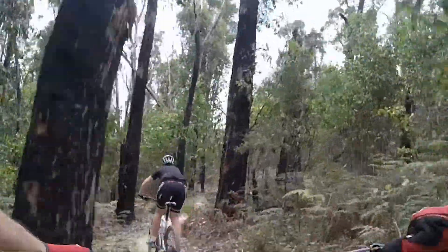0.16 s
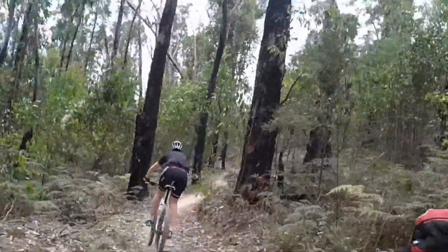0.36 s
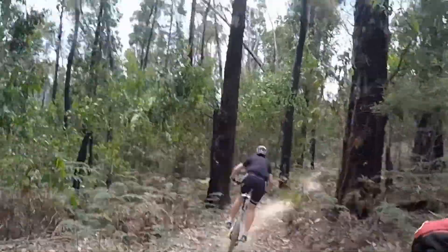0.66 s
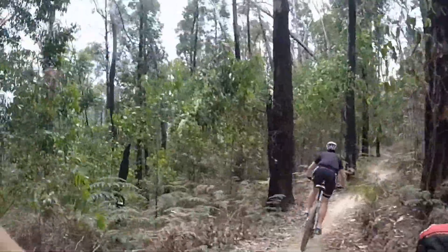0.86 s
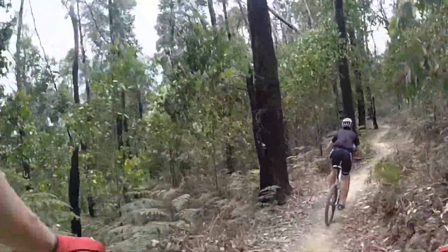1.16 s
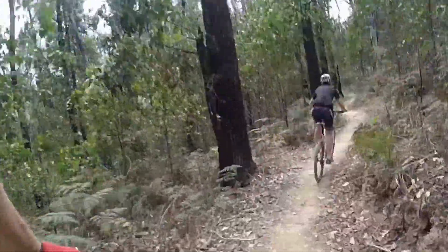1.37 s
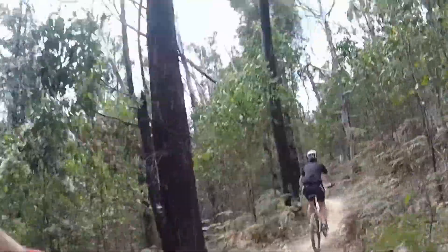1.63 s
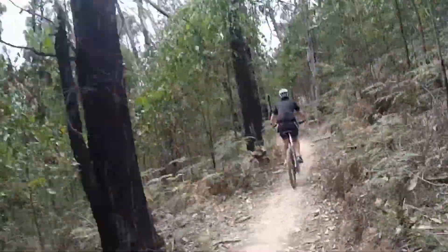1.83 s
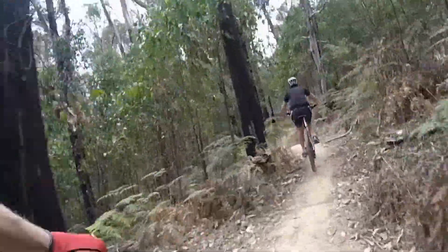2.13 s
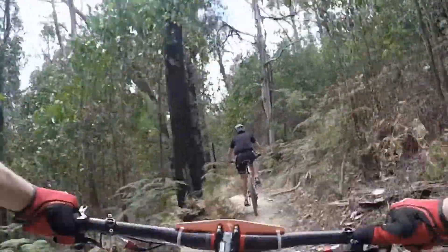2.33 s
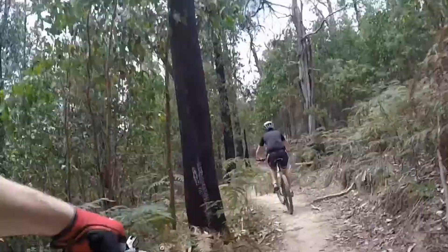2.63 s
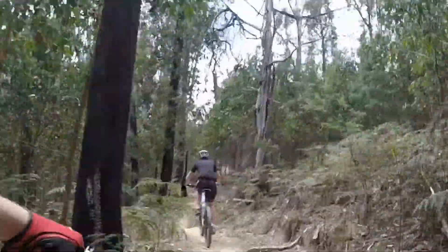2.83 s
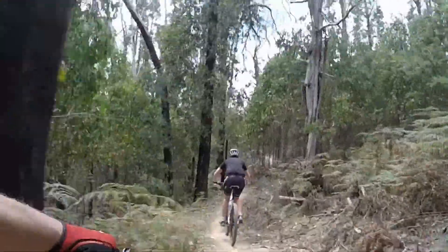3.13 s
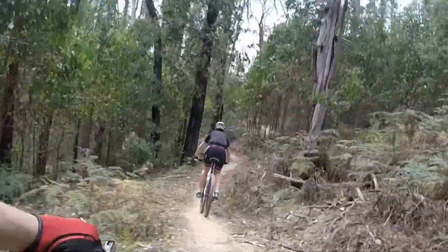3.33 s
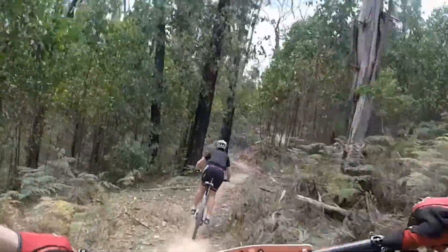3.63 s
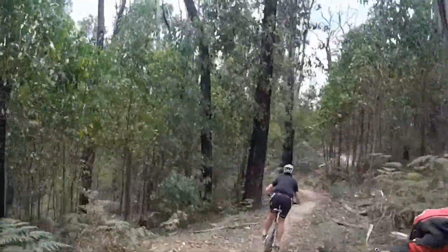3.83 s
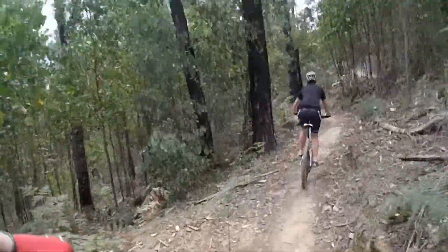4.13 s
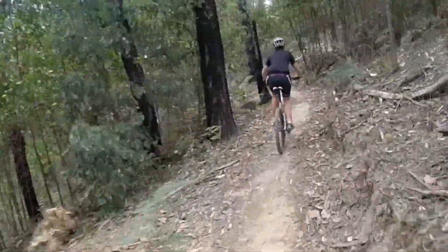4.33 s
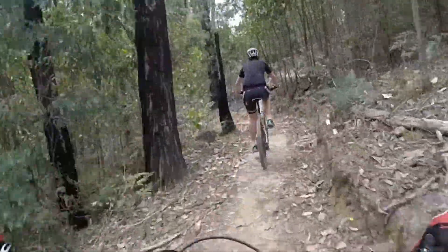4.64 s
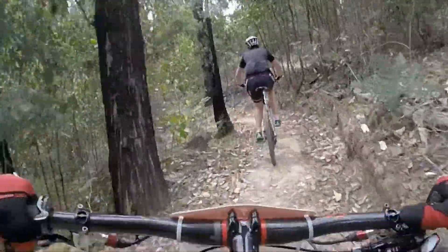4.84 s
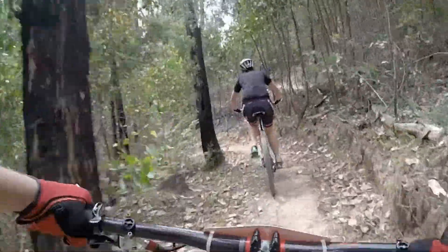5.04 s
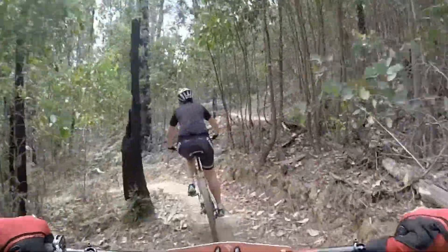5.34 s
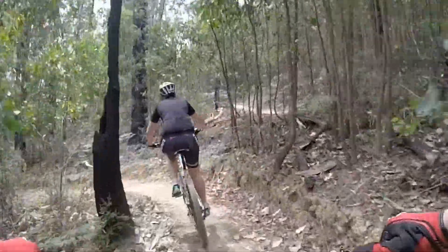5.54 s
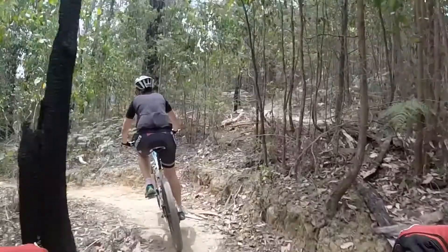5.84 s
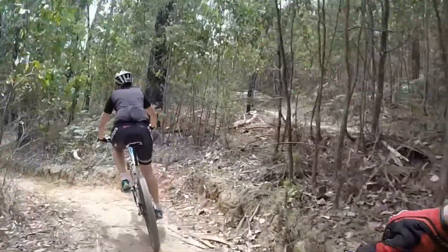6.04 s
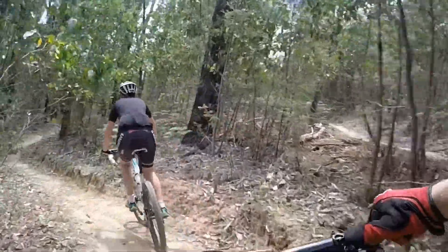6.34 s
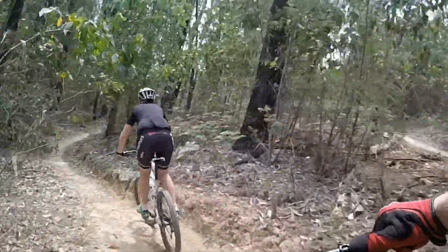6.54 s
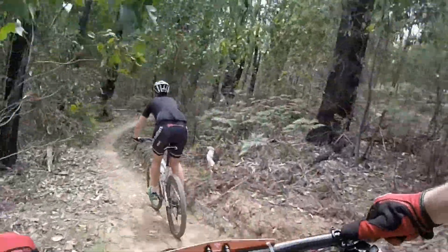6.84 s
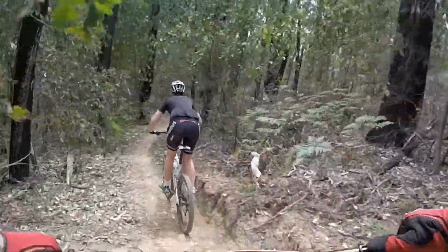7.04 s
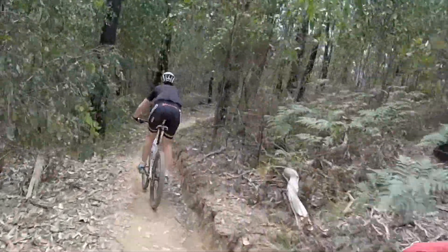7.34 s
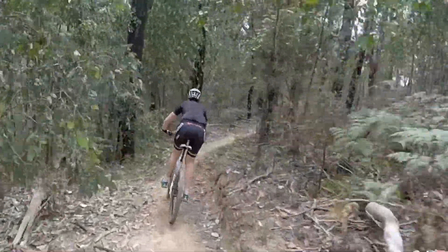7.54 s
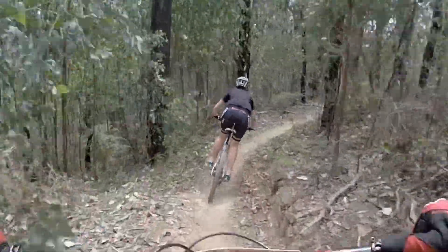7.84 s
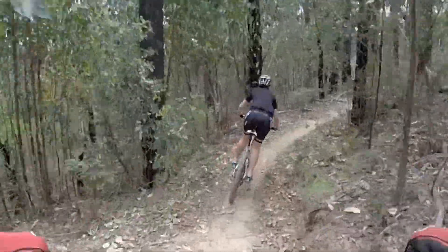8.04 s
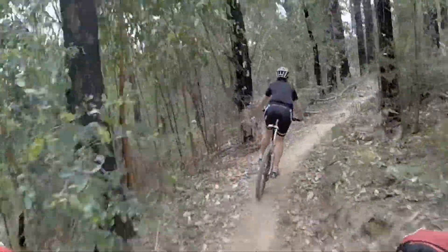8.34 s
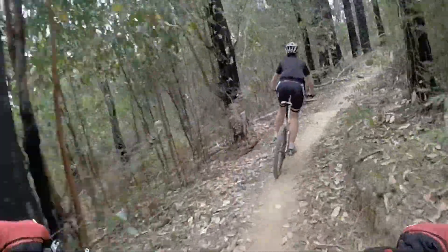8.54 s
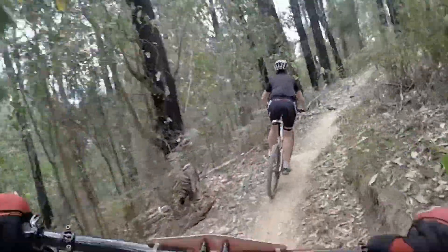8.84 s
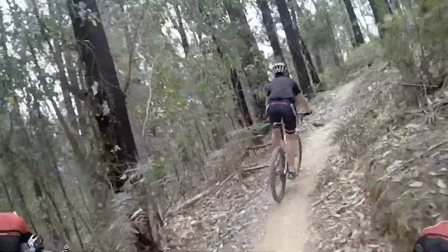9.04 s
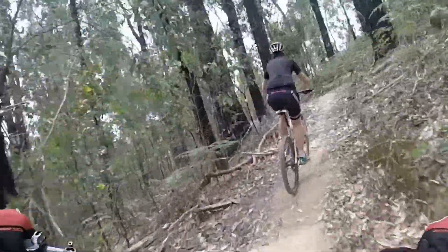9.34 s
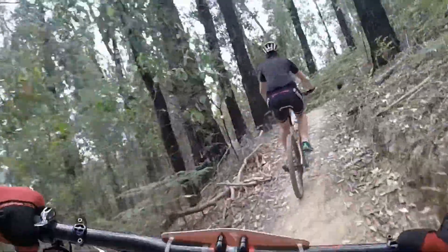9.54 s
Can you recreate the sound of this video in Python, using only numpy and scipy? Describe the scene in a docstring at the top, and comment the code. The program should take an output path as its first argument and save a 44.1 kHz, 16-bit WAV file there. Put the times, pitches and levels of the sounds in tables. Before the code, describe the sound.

A mountain bike rides a dry forest trail, heard close and slightly boxy from a microphone on the rider's chest. Tyres crunch and rumble over dirt and leaves throughout, under low, fluttering wind. For the first 2.3 seconds the chain whirrs with rapid metallic ticks, swelling with each pedal stroke; tyre scuffs, sharp clacks, thuds and a gust cluster around 1.4 to 1.9 seconds. From 2.3 to 4.2 seconds the bike coasts and the chain falls quiet, leaving dull bumps, short scrapes, small gear clicks and a gust near 3 seconds. Pedalling resumes at 4.2, with a loud clatter around 4.5 and another gust just after. From 5 to 7.5 seconds the ride is smoother, the chain pulsing over softer wind. Scuffs, knocks and gusts return around 7.7 to 9 seconds, and pedalling continues to the end, near 9.7 seconds.

```python
"""Mountain bike on a dry forest trail

Heard from a camera in a housing on the rider's chest. The chain ticks tooth by tooth under
pedalling and falls quiet during a bumpy coast. Tyres crunch and scuff over dirt and leaves,
loose parts rattle, bumps thud through the mount, and wind buffets the microphone."""
import sys
import numpy as np
from scipy import signal
from scipy.fft import rfft, irfft, next_fast_len
from scipy.io import wavfile
from scipy.ndimage import uniform_filter1d, map_coordinates

SR = 44100
rng = np.random.default_rng(int(sys.argv[2]) if len(sys.argv) > 2 else 0)


def store_pcm(level_fs):
    """Save levels as 16-bit WAV."""
    pcm = np.round(np.clip(level_fs, -1, 1) * 32767).astype(np.int16)
    wavfile.write(sys.argv[1], SR, np.atleast_2d(pcm).T)


N = 427329
TIME = np.arange(N) / SR

# Chain speed. Each row: time in seconds, teeth per second.
CHAIN_SPEED = [(0.1, 89), (0.47, 45), (0.64, 81), (0.83, 80), (1.02, 54), (1.17, 80), (1.42, 57), (1.9, 88),
               (2.25, 107), (4.2, 82), (4.45, 108), (4.9, 105), (5.25, 105), (5.55, 88), (6.2, 74.5),
               (7.22, 63), (7.38, 77), (7.7, 98), (7.95, 81), (8.4, 110), (8.85, 119), (9.06, 93),
               (9.3, 104), (9.6, 99)]
# Cog spectra. Each row: frequency in Hz, gain in dB.
CHAINRING_COLOUR = [(1200, -24.5), (2100, 5.5), (2450, 13.5), (2640, 12), (2900, 11), (3200, 8.5),
                    (3600, 2), (5000, -28)]
SPROCKET_COLOUR = [(2400, -34), (3250, 8), (3560, 17.5), (3750, 11), (4000, -11.5), (4350, 7), (5000, -23),
                   (8000, -36.5)]
# Chainring resonances. Each row: centre in Hz, half width in Hz, lift in dB.
CHAINRING_MODES = [(2578, 31, 5.4), (2622, 42, 8.9), (3030, 66, 1.6)]
# Lulls in air and trail, with a few lifts. Each row: time in seconds, airflow and rumble change in dB.
LULLS = [(.11, -20.5, -4), (.33, -12, -1), (.57, -3, -3), (.95, 3, -1.5), (1.2, 1, -1.5), (1.94, -8, -7),
         (2.21, -1, 1.5), (2.77, 3.5, -2), (3.58, 7, -6), (3.92, 0.5, -1.5), (4.1, 1, 3.5), (5.03, -8, 1.5),
         (5.46, -6, 3), (5.88, -7, -4.5), (6.06, -2, -2.5), (6.279, -13, -4), (6.39, -1, 0), (6.7, -2, -1),
         (6.84, 3.5, -4), (7.41, -2.5, -4), (7.85, -2, -2.5), (8.23, -4.5, 1), (9.14, 0, -1.5)]
LULL_S = .06


def chain(seat_s=.0026, settle_s=.0036, scatter_db=1.98, db_per_octave=4.5, detune=.026, drift=.018):
    """Rollers seat on teeth and ring links, chainring and sprocket, louder with speed and pedal force."""
    # Pedalling. Each row: start and end in seconds, chain gain in dB, extra sprocket gain in dB.
    spells = [(0.028, 2.33, -2.5, -5.5), (4.18, 9.9, -1.8, 0.46)]
    # Pedal strokes tighten the chain. Each row: start and length in seconds, rise in dB.
    strokes = [(0.11, 0.34, 4.5), (0.448, 0.1, 7.5), (0.708, 0.26, 6.5), (1.17, 0.27, 6.5),
               (1.592, 0.1, 15.5), (1.903, .1, 3.5), (2.116, 0.16, 8.5), (4.41, 0.21, 5), (4.6, 0.39, 5),
               (5.046, 0.2, 6), (5.354, 0.21, 7), (5.58, 0.079, 4.5), (5.82, 0.31, 5.5), (6.3, 0.33, 7),
               (6.866, 0.3, 6.5), (7.325, 0.35, 6), (7.76, 0.31, 7), (8.232, 0.2, 4.5), (8.534, 0.29, 7),
               (8.899, 0.25, 7), (9.25, .26, 7.5), (9.585, 0.15, 8)]
    # Steel link spectrum. Each row: frequency in Hz, gain in dB.
    link_colour = [(300, -14.5), (800, 7), (1500, -10), (2200, 16), (3600, 8.5), (4400, 15), (5300, 4.5),
                   (7000, 11), (7800, -2.5), (11000, -4), (13000, -6), (14500, -35)]
    # Link resonances. Each row: centre in Hz, half width in Hz, lift in dB.
    link_modes = [(4250, 93, 4.5), (5385, 127, 9.5), (5850, 88, 7.5), (6120, 81, -9.5), (6600, 150, 4.5),
                  (8680, 360, 5), (10700, 150, 8.5), (11480, 130, 8.5), (12300, 150, -2.5), (12500, 140, 5)]
    # Notes struck by every tooth. Each row: pitch in Hz, base level in dB.
    cog_notes = [(2620, -96.5), (2880, -89.5), (3560, -91), (3720, -94.5)]
    teeth_per_s, = follow(CHAIN_SPEED)
    teeth = np.cumsum(teeth_per_s) / SR + .0277 * walk(60)
    tooth = teeth.astype(int)
    age_s = teeth % 1 / teeth_per_s
    seating = unit((1 - np.exp(-(age_s / seat_s) ** 2)) * np.exp(-age_s / settle_s))
    running_db = db_per_octave * np.log2(teeth_per_s / 70) + .5 * walk(25)
    push_db = sum(db * held(start_s, start_s + length_s, ramp_s=.09) for start_s, length_s, db in strokes)
    chain_load, sprocket_load = 0, 0
    for start_s, end_s, db, sprocket_db in spells:
        engaged = held(start_s, end_s, ramp_s=.15)
        chain_load += engaged * amp(db)
        sprocket_load += engaged * amp(db + sprocket_db)

    def part(spectrum, modes, load, slide_db, slack_db, push_share, lag_s):
        """One steel part, rung by seating and by sliding between teeth."""
        strength = amp(scatter_db * rng.standard_normal(N // 100))[tooth]
        chatter = unit(np.hypot(strength * seating, amp(slide_db)) * rng.standard_normal(N))
        drive = load * amp(slack_db + push_share * push_db + running_db)
        return waver(colour(chatter * drive, spectrum, modes), lag_s)

    out = part(link_colour, link_modes, chain_load, slide_db=-3, slack_db=-84, push_share=.66, lag_s=0)
    out += part(CHAINRING_COLOUR, CHAINRING_MODES, chain_load,
                slide_db=-15, slack_db=-78, push_share=.83, lag_s=.0011)
    out += part(SPROCKET_COLOUR, (), sprocket_load,
                slide_db=-15, slack_db=-79.5, push_share=.68, lag_s=.0006)
    for hz, db in cog_notes:
        offset, phase_turns = rng.standard_normal((N // 100, 2))[tooth].T
        tooth_hz = hz * (1 + detune * offset + drift * walk(15))
        note = np.sqrt(2) * np.sin(2 * np.pi * (tooth_hz * age_s + phase_turns))
        out += note * seating * chain_load * amp(db + push_db + running_db)
    return sway(out, depth_db=1.55, rate_hz=34)


def tooth_pings():
    """A roller snaps onto its tooth; chainring or sprocket gives one clear tick."""
    # Each row: start in seconds, level in dB, pitch in Hz.
    pings = [(4.437, -58, 3620), (4.469, -58, 3620), (4.975, -60, 2700), (5.117, -60, 3550),
             (5.129, -59, 2646), (5.148, -55, 2740), (5.177, -61, 2700), (5.186, -58, 3627),
             (5.389, -67, 3580), (5.470, -62, 3599), (5.794, -57, 2700), (5.859, -60, 2840),
             (5.886, -61, 3569), (5.925, -65, 3621), (5.990, -62, 2860), (6.261, -61, 3660),
             (6.291, -60, 3660), (6.389, -66, 3610), (6.419, -59, 2810), (6.537, -61, 3603),
             (6.554, -62, 3700), (7.318, -65, 3648), (7.369, -70, 3640), (7.955, -58, 2626),
             (8.012, -62, 3633), (8.239, -60, 3660), (8.419, -54, 2707), (8.922, -57, 3670),
             (8.983, -58, 3572), (9.221, -58, 3607), (9.409, -61, 2665), (9.409, -56, 3656)]
    out = np.zeros(N)
    for start_s, db, hz in pings:
        add(out, start_s, amp(db) * ring(hz, decay_s=.0025))
    return out


def chain_rub(start_s=2.13, end_s=2.27, hz=2631.5, jitter=.0102, level_db=-69.5, flutter_db=2):
    """The chain rubs the chainring: a brief rough note, chopped tooth by tooth."""
    teeth_per_s, = follow(CHAIN_SPEED)
    chop = abs(np.sin(np.pi * np.cumsum(teeth_per_s) / SR))
    phase = 2 * np.pi * np.cumsum(hz * (1 + jitter * walk(250))) / SR
    gain = held(start_s, end_s, ramp_s=.09) * amp(level_db + flutter_db * walk(100))
    return gain * chop * np.sin(phase)


def loose_chain(swing_s=.035, sprocket_db=-3.5):
    """Slack links swing against chainring and sprocket and ring them."""
    # Each row: time in seconds, level in dB.
    swings = [(1.39, -75), (2.2, -71), (2.41, -75.5), (2.52, -78), (2.73, -79), (2.99, -82), (3.17, -74),
              (3.765, -76.5), (4.51, -69), (5.16, -69), (8.97, -66.5), (9.4, -70)]
    brush = rng.standard_normal(N) * swells([(s, amp(db)) for s, db in swings], swing_s, swing_s)
    chainring = colour(brush, CHAINRING_COLOUR, CHAINRING_MODES)
    return chainring + amp(sprocket_db) * colour(brush, SPROCKET_COLOUR)


def tyres(uneven_db=1.26, jerk_db=1.8):
    """Knobs crush and drum on dirt; uneven ground varies the load, and slips scrape in jerks."""
    # Ground. Each row: time in seconds, crunch in dB, rumble in dB.
    trail = [(0.0, -75.5, -69), (0.36, -78.5, -73.5), (0.9, -74.5, -72.5), (1.25, -76, -73),
             (1.72, -71, -63.5), (1.97, -75.5, -67.5), (2.2, -72, -69), (2.8, -75, -66), (3.12, -73, -67),
             (3.35, -77, -70.5), (4.25, -75, -71), (4.55, -69, -61), (4.88, -74, -70), (6.3, -77.5, -73.5),
             (7.15, -77.5, -72), (8.75, -70.5, -66.5), (9.12, -76, -68), (9.69, -74, -69)]
    # Extra load in dips and stony patches. Each row: time in seconds, rise in dB.
    patches = [(.02, 8), (.21, 4.5), (.43, 5), (.7, 3), (.88, 0.5), (1.03, 4.5), (1.49, 2), (1.78, 1.5),
               (3.41, 1), (3.6, 5), (3.79, 3), (4.2, 4), (4.53, 2), (5.7, 1.5), (6.53, 1.5), (7.2, 4),
               (7.92, 4.5), (8.36, 1), (8.97, 3.5)]
    # Sideways slips. Each row: start and length in seconds, level in dB.
    slips = [(0.208, 0.037, -78), (0.663, 0.028, -71.5), (0.993, 0.037, -72), (1.433, 0.033, -63),
             (1.475, .034, -65), (1.591, 0.0093, -54), (1.596, 0.059, -56), (1.608, 0.038, -63.5),
             (1.701, 0.069, -63.5), (2.54, 0.051, -72.5), (2.785, 0.032, -69.5), (2.85, 0.038, -68.5),
             (2.925, 0.049, -64.5), (2.967, 0.036, -61), (3.018, 0.049, -68), (3.103, 0.064, -68),
             (3.177, .045, -74), (3.709, 0.065, -70.5), (7.656, 0.038, -63), (7.746, 0.052, -68),
             (8.637, 0.07, -66.5), (8.904, 0.055, -68)]
    # Spectra. Each row: frequency in Hz, gain in dB.
    dirt_colour = [(200, -4.5), (450, 8), (1000, 9), (1600, 10.5), (2400, 7.5), (3600, 5.5), (4500, -2),
                   (7000, -7), (8000, -13.5), (13000, -21)]
    scuff_colour = [(120, 19), (310, 10.5), (480, 4), (660, 2), (900, 8), (1800, 8), (2280, 13.5),
                    (2600, 5), (3000, 7), (3700, -1), (4300, 1.5), (5000, -8.5), (7000, -10.5),
                    (13000, -44)]
    rumble_colour = [(30, 10.5), (70, 25.5), (110, 22.5), (170, 20), (240, 13.5), (320, 13), (450, 5),
                     (800, -10.5), (2000, -16.5), (6000, -60.5)]
    # Hollow ring of wheel and frame. Each row: centre in Hz, half width in Hz, lift in dB.
    wheel_modes = [(542, 52, -15.5), (650, 59, 4.5), (1360, 280, -1.5), (2345, 75, 2.5), (2940, 210, 1.5)]
    crunch_db, rumble_db = follow(trail)
    load_db = uneven_db * walk(45) + swells(patches, rise_s=.035, fall_s=.045)
    lull_db = swells([(s, db) for s, _, db in LULLS], LULL_S, LULL_S)
    slip = np.zeros(N)
    for start_s, length_s, db in slips:
        add(slip, start_s, amp(db) * signal.windows.tukey(int(length_s * SR), .35))
    crunch = (grit(per_s=5000, spread_db=2.5) + pebbles()) * amp(crunch_db + load_db)
    scuff = grit(per_s=5000, spread_db=.5) * slip * amp(jerk_db * walk(250))
    rumble = rng.standard_normal(N) * amp(rumble_db + load_db + lull_db)
    return colour(crunch, dirt_colour) + colour(scuff, scuff_colour, wheel_modes) + colour(rumble, rumble_colour)


def grit(per_s, spread_db):
    """Crumbs and leaves break: random impulses, many small, few large."""
    strength = amp(spread_db * np.minimum(rng.exponential(size=N), 2 * np.pi))
    return unit((rng.random(N) < per_s / SR) * strength * rng.choice([-1, 1], N))


def pebbles(per_s=40, relative_db=-6.5, spread_db=8, centre_hz=2084, spread_octaves=.52, slot_s=.005):
    """Small stones spat from under the knobs click at random pitch and strength."""
    out = np.zeros(N)
    for slot, (chance, size, pitch) in enumerate(rng.random((int(N / SR / slot_s), 3))):
        if chance < per_s * slot_s:
            hz = centre_hz * 2 ** (spread_octaves * (2 * pitch - 1))
            db = relative_db + spread_db * (2 * size - 1)
            add(out, slot * slot_s, amp(db) * ring(hz, decay_s=.0047))
    return out


def clacks(ring_db=-11.5, ring_s=.0035):
    """Chain and stones knock on the bike, brighter metal on metal; the struck part rings briefly."""
    # Each row: start in seconds, level in dB, decay scale in seconds, tilt in dB, ring in Hz.
    hits = [(0.286, -56, 0.0025, -1, 2800), (0.666, -55, 0.0044, -8, 2080), (0.865, -58, 0.003, -13, 2090),
            (0.876, -59, 0.0033, -13, 2510), (1.157, -58.5, 0.0033, -20, 2180),
            (1.284, -57, .004, 12, 2843), (1.4725, -49.5, 0.0026, -13, 1900),
            (1.495, -59, 0.0056, -18, 1910), (1.6256, -43, 0.0026, -1, 2340),
            (1.636, -53, 0.0028, -9, 2176), (1.818, -61, 0.0026, 0, 2300), (1.863, -55.5, 0.0035, 14, 1380),
            (1.898, -54, 0.0028, 16, 2970), (2.094, -56.5, 0.0036, -13, 1650),
            (2.1405, -59, .003, -10, 1820), (3.3755, -60, 0.004, -10, 2120), (3.41, -58, 0.0023, 9, 3600),
            (3.424, -59, 0.0037, -9, 1700), (3.5307, -61.5, 0.0043, -13, 1750),
            (3.563, -54.5, .003, -8, 2220), (3.899, -65, .004, 0, 2720), (3.924, -64, 0.0036, -7, 1470),
            (3.987, -65, .004, -3, 1630), (4.056, -56, 0.0042, 7, 2220), (4.068, -57.5, 0.0068, -4, 2650),
            (4.28, -57, 0.0027, -8, 1676), (4.4595, -47.5, 0.0038, -6, 2153),
            (4.502, -40.5, 0.0029, 1, 2760), (4.5343, -45, 0.0043, -2, 2180),
            (4.651, -51.5, 0.01, -10, 2250), (6.262, -70, 0.0017, 7, 3500), (6.4177, -65, 0.014, 21, 2680),
            (6.6223, -56.5, 0.0029, 13, 3560), (6.871, -61, 0.0028, 12, 2810),
            (7.907, -53, 0.0047, 1, 1500), (8.0924, -67, 0.0032, 7, 3640),
            (8.4185, -54.5, 0.0074, -10, 1703), (8.71, -49.5, 0.003, -7, 2146),
            (8.754, -48, 0.0045, 3, 1590), (8.768, -51.5, 0.0045, 17, 2740)]
    # Each row: frequency in Hz, gain in dB.
    clack_colour = [(200, -5), (700, -1.5), (1200, -3.5), (1800, 4.5), (2600, 2), (3600, -1), (4600, -10.5),
                    (6800, -10.5), (8000, -31.5), (14000, -33)]
    out = np.zeros(N)
    for start_s, db, decay_s, tilt_db, hz in hits:
        blow = tilt(rattle(decay_s, crack_db=11), tilt_db, pivot_hz=2600)
        add(out, start_s, amp(db) * (blow + amp(ring_db) * ring(hz, ring_s)))
    return colour(out, clack_colour)


def gear_clicks(ring_db=-9.5):
    """Sharp metal clicks of the gears, each ringing at its own pitch."""
    # Each row: start in seconds, level in dB, decay scale in seconds, tilt in dB, ring in Hz,
    # ring decay in seconds.
    hits = [(1.7662, -59, 0.0057, -6, 3650, 0.0027), (1.957, -54.5, 0.0033, 13, 1870, 0.0058),
            (2.326, -64.5, 0.0056, -7, 3700, 0.0064), (2.4917, -67.5, 0.0034, -6, 6600, .003),
            (2.6454, -60, 0.0014, -9, 3810, 0.0044), (3.159, -69, .003, -8, 6900, .005),
            (3.176, -62, 0.0025, -7, 5760, 0.0055), (3.397, -64, 0.0021, -2, 6840, 0.0027),
            (3.957, -74, 0.0044, 9, 6750, .004), (4.066, -66.5, 0.0027, -7, 6500, .003),
            (4.6495, -53, 0.0021, 10, 6410, 0.0028)]
    # Each row: frequency in Hz, gain in dB.
    click_colour = [(500, -17), (1800, 5), (2600, 0), (4000, 8), (5100, -1.5), (6800, 4), (8000, -7.5),
                    (11000, -9.5), (14500, -26)]
    # Gear mechanism resonances. Each row: centre in Hz, half width in Hz, lift in dB.
    gear_modes = [(1760, 170, 6.1), (3560, 230, 3.3), (5400, 180, 9.6), (6800, 130, 1.6), (8740, 150, 2),
                  (10700, 430, 1.8)]
    out = np.zeros(N)
    for start_s, db, decay_s, tilt_db, hz, ring_s in hits:
        blow = tilt(rattle(decay_s, crack_db=6), tilt_db, pivot_hz=7000)
        add(out, start_s, amp(db) * (blow + amp(ring_db) * ring(hz, ring_s)))
    return colour(out, click_colour, gear_modes)


def rattle(decay_s, crack_db, rise_s=.0006):
    """Loose parts meet: a crack, then a chatter of contacts that stops short."""
    t = TIME[:SR // 10]
    envelope = (1 - np.exp(-t / rise_s)) * np.exp(-(t / (1.22 * decay_s)) ** 2)
    blow = envelope * rng.standard_normal(len(t))
    blow[0] = amp(crack_db)
    return blow


def thuds(rise_share=.3, shudder_db=-21.5, shudder_s=.0068):
    """Tyre-cushioned bumps jolt the camera mount and shake the frame; short contacts sound harder."""
    # Each row: start in seconds, level in dB, contact time in seconds.
    bumps = [(0.21, -64, 0.0051), (0.418, -58, 0.0021), (0.503, -60.5, 0.0025), (0.664, -58.5, 0.0017),
             (0.732, -62, 0.002), (0.875, -61.5, 0.0028), (1.308, -73, 0.0055), (1.498, -46.5, 0.00051),
             (1.712, -59, 0.0029), (1.787, -49.5, 0.0024), (2.15, -62, 0.0018), (2.411, -66, 0.00086),
             (2.507, -51.5, 0.00096), (2.62, -44.5, 0.00093), (2.972, -49.5, 0.0039),
             (3.188, -47.5, 0.00088), (3.975, -68, 0.0037), (4.503, -59, 0.0019), (4.533, -63, 0.0011),
             (4.662, -56, .008), (5.298, -67, 0.0054), (7.744, -56, 0.00092), (7.948, -59.5, 0.0019),
             (8.391, -59, 0.0042)]
    # Each row: frequency in Hz, gain in dB.
    thud_colour = [(30, 14.5), (90, 24.5), (160, 20), (330, 10.5), (600, -1), (1100, 15), (2500, -34),
                   (6000, -44)]
    force, t = np.zeros(N), TIME[:SR // 10]
    for start_s, db, contact_s in bumps:
        cushion = 1 - np.exp(-t / (rise_share * contact_s))
        push = np.exp(-t / contact_s) * (1 + rise_share - t / contact_s)
        shudder = amp(shudder_db) * np.exp(-t / shudder_s) * rng.standard_normal(len(t))
        add(force, start_s, amp(db) * cushion * (push + shudder))
    return colour(force, thud_colour)


def wind():
    """Turbulence flutters on the microphone; an eddy sucks briefly between two pressure swells."""
    # Steady airflow. Each row: time in seconds, level in dB.
    airflow = [(0.0, -48.5), (1.1, -53.5), (2.15, -47), (2.65, -45), (2.83, -56), (3.15, -50), (3.65, -54),
               (4.6, -49), (5.05, -56.5), (6.3, -58.5), (7.3, -61), (7.75, -59), (8.5, -50), (9.12, -62.5),
               (9.69, -56.5)]
    # Each row: time in seconds, rise in dB.
    gusts = [(0.0, 8.5), (.26, 2), (.65, 4.5), (1.42, 1), (1.74, 12), (2.1, 2), (2.99, 12.5), (3.84, 1),
             (4.74, 8), (5.24, 5.5), (5.61, 0), (6.53, 4.5), (7.38, 10), (7.98, 12.5), (8.77, 9.5),
             (8.92, 9)]
    # Each row: centre in seconds, peak in dB, half width in seconds.
    eddies = [(0.679, -41, 0.014), (1.726, -31.5, 0.013), (1.79, -29, 0.013), (2.983, -29.5, 0.011),
              (3.848, -33, 0.015), (4.682, -28, 0.011), (4.8, -36, 0.013), (5.289, -41, 0.016),
              (5.739, -46, 0.004), (6.172, -45.5, 0.0051), (7.07, -47, 0.0048), (7.503, -45.5, 0.0042),
              (9.278, -40.5, 0.011)]
    # Each row: frequency in Hz, gain in dB.
    wind_colour = [(5, 20.5), (14, 38), (24, 30.5), (35, 23.5), (50, 16), (80, 5), (150, -3), (400, -34),
                   (2000, -57.5)]
    flow_db, = follow(airflow)
    gust_db = swells(gusts, rise_s=.05, fall_s=.08)
    lull_db = swells([(s, db) for s, db, _ in LULLS], LULL_S, LULL_S)
    air = colour(rng.standard_normal(N) * amp(flow_db + gust_db + lull_db), wind_colour)
    t = np.arange(-SR // 10, SR // 10) / SR
    for centre_s, peak_db, half_width_s in eddies:
        square = (t / half_width_s) ** 2
        add(air, centre_s + t[0], -amp(peak_db) * (1 - square) * np.exp(-square / 2))
    return air


def sway(x, depth_db, rate_hz, count=10):
    """Shifting contact favours different resonances: bands swell and fade independently."""
    size = next_fast_len(N, real=True)
    spectrum = rfft(x.astype(np.float32), size)
    place = np.sqrt(np.linspace(0, 1, len(spectrum), dtype=np.float32)) * (count - 1)
    bands = (irfft(spectrum * np.maximum(1 - abs(place - k), 0), size)[:N] for k in range(count))
    return sum(band * amp(depth_db * walk(rate_hz)) for band in bands)


def waver(x, lag_s, rate_hz=14):
    """The chain's grip shifts, so the ringing wanders in pitch."""
    return map_coordinates(x, [(TIME + lag_s * walk(rate_hz)) * SR], mode="nearest")


def ring(hz, decay_s):
    """One struck resonance."""
    t = TIME[:SR // 10]
    return np.sin(2 * np.pi * hz * t) * np.exp(-t / decay_s)


def tilt(x, db, pivot_hz):
    """Tip the treble against the bass."""
    low = signal.lfilter(*signal.butter(1, pivot_hz, fs=SR), x)
    return low * amp(-db / 2) + (x - low) * amp(db / 2)


def colour(x, spectrum=((1000, 0),), modes=(), size=16384):
    """Minimum-phase filter: a smooth spectrum plus peaks and dips."""
    bin_hz = np.maximum(np.arange(size // 2 + 1) * SR / size, 1)
    hz, db = np.transpose(spectrum)
    db = np.interp(np.log(bin_hz), np.log(hz), db)
    for centre_hz, half_width_hz, lift_db in modes:
        db += lift_db * np.exp(-((bin_hz - centre_hz) / half_width_hz) ** 2)
    cepstrum = irfft(np.log(amp(db)))
    cepstrum[1:size // 2] *= 2
    cepstrum[size // 2 + 1:] = 0
    return signal.oaconvolve(x, irfft(np.exp(rfft(cepstrum))))[:N]


def swells(events, rise_s, fall_s):
    """Sum of smooth humps, one per (time in seconds, height)."""
    t = TIME[::100]
    humps = (height * np.exp(-((t - s) / np.where(t < s, rise_s, fall_s)) ** 2) for s, height in events)
    return np.interp(TIME, t, sum(humps))


def held(start_s, end_s, ramp_s):
    """0-to-1 gate, ramps centred on start and end."""
    return np.clip(np.minimum(TIME - start_s, end_s - TIME) / ramp_s + .5, 0, 1)


def walk(rate_hz):
    """Smooth random curve, rms 1."""
    levels = rng.standard_normal(N // 20)
    joined = np.interp(TIME * rate_hz, np.arange(len(levels)), levels)
    return unit(uniform_filter1d(joined, int(SR / rate_hz / 2)))


def follow(table):
    """Interpolate a timed table's columns per sample."""
    times_s, *columns = np.transpose(table)
    return [np.interp(TIME, times_s, column) for column in columns]


def add(track, start_s, sound):
    """Mix a sound in at its time."""
    i = max(int(start_s * SR), 0)
    track[i:i + len(sound)] += sound[:N - i]


def amp(db):
    """Decibels to gain."""
    return np.exp(np.asarray(db) * (np.log(10) / 20))


def unit(x):
    """Scale to rms 1."""
    return x / np.sqrt(np.mean(x ** 2))


def scene():
    """Drivetrain, tyres, knocks and wind, all close; mono."""
    drivetrain = chain() + tooth_pings() + chain_rub() + loose_chain()
    return (drivetrain + tyres() + clacks() + gear_clicks() + thuds() + wind())[None]


def record(dry, cutoff_hz=14200):
    """The camera housing rings; the top is cut."""
    # Each row: centre in Hz, half width in Hz, lift in dB.
    housing_modes = [(330, 12, 2.5), (665, 45, 3.5), (1129, 16, -6.5), (1479, 92, 5), (1705, 39, 2.5),
                     (2092, 130, 3.5), (2200, 22, 2), (2667, 33, 4.5), (2877, 120, 5), (3295, 220, -3.5),
                     (3615, 226, 7), (4075, 62, -7), (6620, 130, 2.5)]
    boxed = colour(dry[0], modes=housing_modes)
    return signal.sosfilt(signal.ellip(8, .2, 70, cutoff_hz, fs=SR, output="sos"), boxed)[None]


dry = scene()
out = record(dry)
store_pcm(out)
```